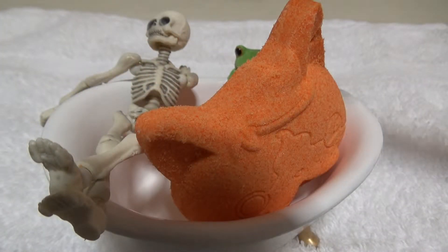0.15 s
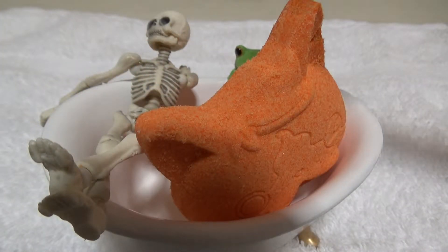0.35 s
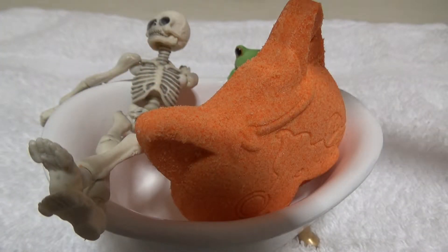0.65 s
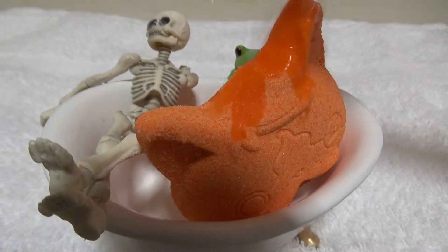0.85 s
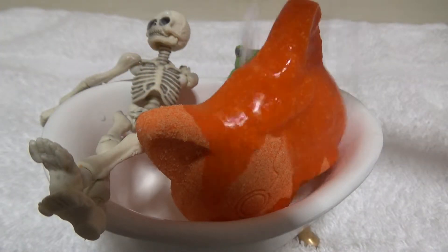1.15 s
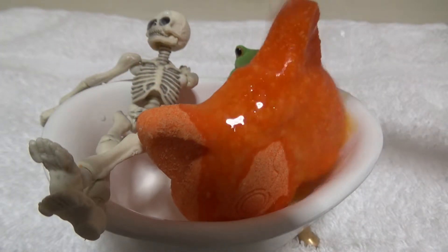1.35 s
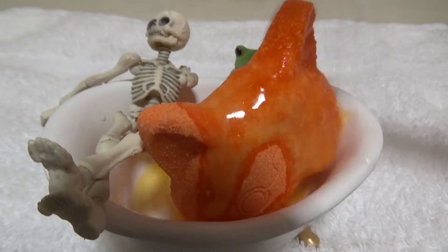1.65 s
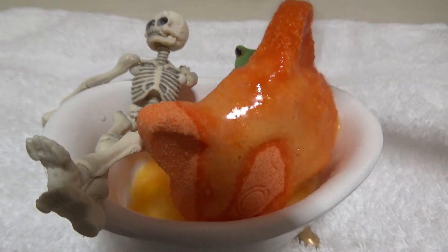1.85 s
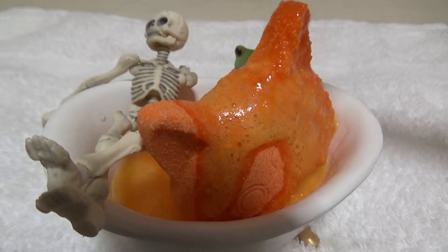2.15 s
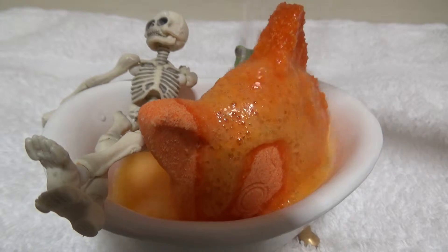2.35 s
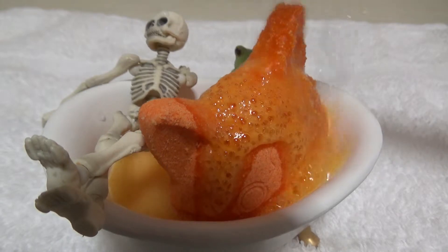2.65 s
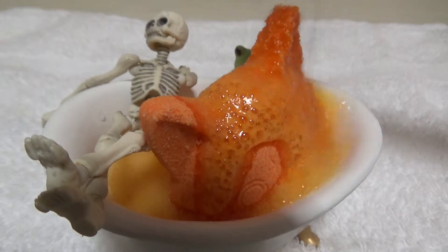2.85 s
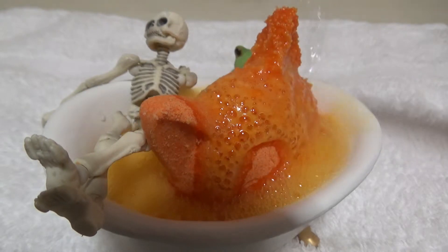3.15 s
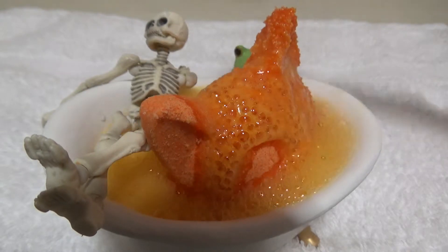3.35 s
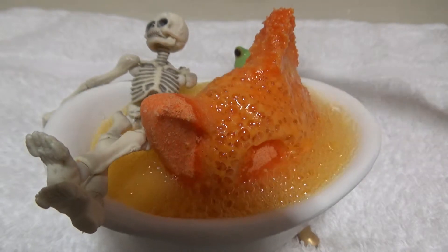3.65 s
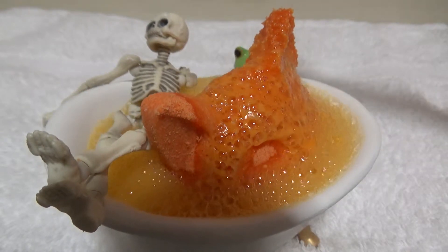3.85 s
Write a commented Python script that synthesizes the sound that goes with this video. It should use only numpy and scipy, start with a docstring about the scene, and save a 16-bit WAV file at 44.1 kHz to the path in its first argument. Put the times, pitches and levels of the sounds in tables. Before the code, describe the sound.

After nearly a second of faint ventilation and hum, drops tick on a hard tablet, then dense fizz grows into a steady sizzle with snapping bubbles and soft plops, heard close in a quiet room.

```python
"""A small tub in a quiet room: water is poured over a bath bomb, heard up close.
Thousands of tiny gas bubbles burst into a hiss that swells as the surface gets wet.
Larger bubbles snap and ring one by one, over faint crackle and low plops; a drop smacks the hard tablet.
Bursts are short decaying cavity rings, the smack is a set of decaying sines.
Behind them, filtered noise makes a soft ventilation rush and a sine a wavering mains hum."""
import sys
import numpy as np
from scipy import signal
from scipy.fft import rfft, irfft
from scipy.io import wavfile
from scipy.ndimage import uniform_filter1d

SR = 44100
rng = np.random.default_rng(int(sys.argv[2]) if len(sys.argv) > 2 else 0)


def transcribe(u):
    """Save the signal u as a 16-bit wav file named by the first command-line argument.

    u: samples, shape (n,) or (channels, n), limited to [-1, 1]; the rate is SR.
    q: integer samples, one column per channel.
    """
    v = np.clip(np.atleast_2d(u).T, -1, 1)
    q = np.round(v * 32767).astype(np.int16)
    wavfile.write(sys.argv[1], SR, q)


N = 176400

# Ventilation colour: pitch_hz, relative_db (per Hz)
RUSH_COLOUR = [(15, -42), (25, -21), (65, -11), (85, -9), (110, -5.5), (200, -7), (300, -11.5), (400, -14),
               (590, -17), (780, -16), (1050, -20.5), (1320, -23), (1700, -25.5), (2200, -22.5),
               (2900, -29), (4500, -30), (6300, -29.5), (8500, -31.5), (9300, -33.5), (10000, -24.5),
               (10900, -27.5), (11500, -31.5), (13000, -35), (15800, -31.5)]
# Stereo width of the rush: pitch_hz, side_minus_mid_db
RUSH_SIDE = [(30, -15), (150, -17), (500, -13), (1300, -18.5), (2000, -37), (5200, -34), (6200, -23),
             (10500, -18), (12000, -50)]
# Duct bands in the rush: pitch_hz, width_hz, relative_db
DUCT_BANDS = [(965.5, 53, 0), (1508, 150, -5), (2210, 84, -9)]
RUSH_DB, DUCTS_DB = -53.5, -63  # mid rms before the patches; the rush is gauged above 130 Hz
RUSH_PATCH_DB, RUSH_FLICKER_DB = 0.94, 0.31
# Wavering hum: start_s, level_db (rms)
HUM_LEVEL = [(0.0, -52), (0.03, -53.5), (0.27, -56.5), (0.31, -64), (0.59, -53.5), (0.81, -55), (0.87, -73),
             (0.91, -61), (1.24, -52.5), (1.31, -60), (1.66, -57), (1.73, -51), (2.19, -60.5), (2.27, -84),
             (2.38, -60), (2.56, -54.5), (2.88, -61.5), (3.32, -62), (3.34, -84), (3.58, -58), (3.71, -65),
             (3.75, -72), (3.81, -60), (4.0, -66)]
HUM_HZ = 100.7

# Plops of small unseen bubbles in the pool: start_s, level_db (rms)
GURGLE_LEVEL = [(1.4, -64), (1.9, -68), (2.3, -54.5), (2.5, -52), (2.7, -57), (3.0, -54), (3.3, -57.5),
                (4.0, -62)]
GURGLE_LOW_HZ, GURGLE_HIGH_HZ, GURGLE_CYCLES = 244, 2270, 1.18
GURGLES_PER_S = 10  # for each of 12 bubble sizes
CRACKLE_LOW_HZ, CRACKLE_HIGH_HZ, CRACKLE_CYCLES = 2730, 7000, 1.1
CRACKLES_PER_S, CRACKLE_SPREAD_DB = 14, 3  # rate for each of 12 bubble sizes
CRACKLE_DB = -5.5  # against the large fizz

# Larger bubbles and drops: start_s, snap_db, snap_hz, ring_db, ring_hz, ring_decay_cycles
BIG_BUBBLES = [(0.6589, -24.5, 7110, -20.5, 1330, 0.45), (0.6618, -34, 1010, -42, 2360, 5.2),
               (0.67, -45, 2110, -30.5, 380, 0.54), (0.8485, -37, 2100, -36, 1900, 3.6),
               (0.8539, -33, 4400, -43, 2250, 1.3), (0.8639, -39, 1710, -27.5, 250, 0.42),
               (0.9268, -24, 5220, -52, 185, 3.1), (0.954, -42, 5130, -27, 4890, 1.8),
               (1.0577, -30, 10500, -40, 9450, 1.5), (1.232, -43.5, 670, -19.5, 6670, 2.2),
               (1.2387, -40, 5500, -43, 4950, 1.5), (1.4273, -27, 3930, -14.5, 3570, 1.3),
               (1.4674, -30, 5480, -14.5, 3870, 1.3), (1.4958, -26, 4200, -15, 3600, 1.54),
               (1.5117, -17, 5970, -13, 3530, 1.9), (1.5353, -35, 5000, -38, 4500, 1.5),
               (1.5649, -50, 820, -31.5, 2340, 2.9), (1.621, -30.5, 1440, -9, 3320, 1.07),
               (1.732, -15, 6000, -24, 5400, 1.5), (1.7396, -25, 5500, -28, 4950, 1.5),
               (1.8668, -24, 4150, -23, 2270, 2.8), (1.9915, -11, 6870, -35, 450, 1.14),
               (1.9939, -48, 670, -37, 447, 1.1), (2.041, -12, 3260, -22, 2260, 1),
               (2.044, -6.5, 4850, -20, 1540, 0.7), (2.0491, -39, 670, -31, 1900, 3.5),
               (2.08, -45, 670, -12, 4330, 2.4), (2.1824, -9.5, 4930, -29.5, 406, 0.83),
               (2.2782, -22.5, 2660, -29, 380, 0.6), (2.3307, -17, 5910, -7, 5240, 2.4),
               (2.3359, -6.5, 5300, -13, 2600, 2.8), (2.3498, -11, 2810, -16.5, 640, 0.7),
               (2.353, -27, 930, -5, 2570, 1.8), (2.386, -10, 4000, -20, 2000, 0.8),
               (2.3929, -13, 3030, -24, 554, 0.47), (2.3985, -18.5, 2020, -4, 2680, 2.3),
               (2.4172, -21.5, 2040, -16, 2780, 2.1), (2.4333, -6.5, 4080, -28, 670, 0.74),
               (2.4546, -11, 5750, -27, 2510, 4.5), (2.4662, -30, 2300, -38, 2070, 1.5),
               (2.4758, -14, 2790, -17, 760, 1.0), (2.4835, -31, 690, -21, 2620, 3.0),
               (2.4932, -7.5, 5020, -28, 704, 0.7), (2.498, -14, 2700, -31, 740, 1.7),
               (2.5017, -22, 5500, -25, 4950, 1.5), (2.5072, -29, 675, -32, 460, 1.3),
               (2.5399, -20.5, 1580, -10, 2960, 1.5), (2.5553, -31, 720, -8, 3070, 0.63),
               (2.5907, -20, 3210, -31, 347, 0.82), (2.608, -29, 2500, -34, 2240, 1.5),
               (2.6388, -6, 4020, -21.5, 500, 0.49), (2.8059, -34, 2200, -37, 1980, 1.5),
               (2.8608, -13.5, 2720, -27, 445, 0.57), (2.8976, -29, 4000, -25, 3600, 1.5),
               (2.9208, -27, 3000, -30, 2700, 1.5), (2.9654, -16, 2600, -26, 1500, 0.8),
               (2.9739, -13, 3000, -24, 2000, 0.92), (3.0095, -10, 4190, -28, 330, 0.57),
               (3.0215, -31.5, 740, -10, 4530, 1.0), (3.029, -27.5, 1140, -15.5, 370, 0.92),
               (3.0678, -30, 2850, -14, 3430, 1.6), (3.1298, -37, 1030, -7, 4230, 2.3),
               (3.1646, -5.5, 6180, -26, 310, 0.47), (3.185, -36, 780, -30, 188, 0.76),
               (3.2058, -47, 880, -19.5, 2120, 1.2), (3.2193, -22, 4400, -27, 3960, 1.3),
               (3.2565, -36, 10940, -25, 347, 0.57), (3.3009, -34, 2400, -37, 2160, 1.5),
               (3.885, -27, 2270, -41, 444, 3.6)]
RING_RISE_CYCLES, RING_FALL_POWER = .4, 1.5

# Fizz by bubble size: start_s, large_db, middle_db, small_db (mid rms)
FIZZ_LEVELS = [(.8, -72, -61, -62), (.86, -70, -67, -68), (.93, -59, -64, -55), (1.0, -71, -63, -56.5),
               (1.1, -68, -61, -55.5), (1.2, -68, -57, -51), (1.33, -64.5, -49.5, -46),
               (1.45, -51, -43, -42), (1.55, -51, -41, -38.5), (1.65, -47, -38.5, -34),
               (1.71, -44.5, -36.5, -35.5), (1.73, -46.5, -32, -34), (1.77, -44, -34.5, -33.5),
               (1.85, -43.5, -33.5, -31.5), (2.0, -45.5, -32, -31), (2.2, -44.5, -33, -30.5),
               (2.35, -43, -32.5, -31.5), (2.5, -41.5, -30.5, -29.5), (2.7, -42, -31.5, -29.5),
               (2.95, -43, -31.5, -30.5), (3.15, -42.5, -32.5, -30), (3.5, -43.5, -32, -30),
               (4.0, -43, -32, -30)]
# Where large meets middle and middle meets small: edge_hz
FIZZ_EDGES = (3700, 9000)
# Tone of the hiss: pitch_hz, relative_db (per Hz)
HISS_COLOUR = [(590, -43), (1000, -10.5), (1040, -24), (1230, -19.5), (1500, -18.5), (1680, -15.5),
               (2400, -11.5), (4120, -4.5), (4780, -3), (5490, -4.5), (6450, -1.5), (8700, -5.5),
               (9650, -0.5), (10800, 1.5), (12900, -2.5), (15100, -8), (15600, -15)]
# Stereo width of the hiss: pitch_hz, side_minus_mid_db
HISS_SIDE = [(900, -11), (1300, -62), (9300, -99), (10300, -30), (11500, -16), (13200, -24.5), (14000, -60)]
FIZZ_LOW_HZ, FIZZ_HIGH_HZ, BURST_CYCLES = 1163, 16850, 1.52
# each of 24 sizes bursts at this rate when the small fizz is at FULL_DB, fewer while it is faint
FULL_BURSTS_PER_S, FULL_DB, SPARSE_POWER = 1500, -30, .35
BURST_SPREAD_DB, FIZZ_PATCH_DB = 1.5, 0.48
WET_S, WETTING_S = .78, .036  # onset of the fizz and its fade-in time

# Modes of the dry, hard tablet: pitch_hz, level_db, t60_s
TABLET_MODES = [(200, -32, 0.018), (1100, -23, 0.0041), (4260, -17.5, 0.0067), (6300, -10, 0.0031),
                (7460, -11, 0.0023), (10560, -5, 0.0028), (12800, -11, .003), (14300, -14, .003)]
SMACK_S, SMACK_RISE_S, SMACK_LENGTH_S = .9345, .00012, .1

# Hollow notes of the tub: pitch_hz, width_hz, level_db (against the direct sound)
HOLLOW_NOTES = [(460, 57, -6), (850, 74, -1.5)]
WALLS_DB, WALLS_T60_S, FIRST_WALL_S = -16, .02, .0006
LOW_CUT_HZ, EDGE_HZ = 14, 15740


def gain_of(db):
    """dB to gain."""
    return 10 ** (np.asarray(db) / 20)


def evened(x):
    """Scales to rms 1."""
    return x / np.sqrt(np.mean(x ** 2) + 1e-20)


def read(points, hz):
    """Reads a spectrum table on a log pitch axis."""
    f, value = np.transpose(points)
    return np.interp(np.log(hz + 1), np.log(f + 1), value)


def along(table, column):
    """Reads a time curve at every sample."""
    table = np.array(table)
    return np.interp(np.arange(N) / SR, table[:, 0], table[:, column])


def shaped(x, gain):
    """Filters by a gain per frequency bin."""
    return irfft(rfft(x) * gain, N)


def patchy(x, patch_db, flicker_db):
    """Drifting louder and softer patches, and a flicker shared by all pitches."""
    z = signal.stft(x, nperseg=256)[2]
    chance = rng.standard_normal(z.shape)
    across_pitch = uniform_filter1d(chance, 6, 0)
    patch = evened(uniform_filter1d(across_pitch, 20, 1))
    flicker = evened(uniform_filter1d(rng.standard_normal(z.shape[1]), 5))
    gain = gain_of(patch_db * patch + flicker_db * flicker)
    return signal.istft(z * gain, nperseg=256)[1][:N]


def room():
    """Ventilation rush with a few duct bands, nearly mono, and a hum whose level wavers."""
    hz = np.fft.rfftfreq(N, 1 / SR)
    mid_noise, side_noise, duct_noise = rng.standard_normal((3, N))
    rush = shaped(mid_noise, gain_of(read(RUSH_COLOUR, hz)))
    scale = gain_of(RUSH_DB) / shaped(rush, hz > 130).std()
    bands = sum(gain_of(db) / np.hypot(1, 2 * (hz - f) / width) ** 2 for f, width, db in DUCT_BANDS)
    ducts = gain_of(DUCTS_DB) * evened(shaped(duct_noise, bands))
    mid = patchy(scale * rush + ducts, RUSH_PATCH_DB, RUSH_FLICKER_DB)
    side_colour = gain_of(read(RUSH_COLOUR, hz) + read(RUSH_SIDE, hz))
    side = scale * shaped(side_noise, side_colour)
    tone = np.sqrt(2) * np.sin(2 * np.pi * HUM_HZ * np.arange(N) / SR)  # rms 1
    hum = gain_of(along(HUM_LEVEL, 1)) * tone
    return np.array([mid + side, mid - side]) + hum


def bubble(hz, cycles, size=900):
    """A cavity that swells, rings and dies; heard as the change of its volume, suction first."""
    turns = hz * np.arange(size) / SR
    rise = 1 - np.exp(-(turns / RING_RISE_CYCLES) ** 2)
    fall = np.exp(-(turns / max(cycles, .3)) ** RING_FALL_POWER)
    volume = np.sin(2 * np.pi * turns) * rise * fall
    return -np.gradient(volume) * SR / (2 * np.pi * hz)


def swarm(low_hz, high_hz, per_s, spread_db, cycles, count):
    """Bubble sizes bursting at random moments, random strength if spread; steady power at any rate."""
    out = np.zeros(N)
    for hz in np.geomspace(low_hz, high_hz, count):
        when, size = rng.random(N), rng.exponential(1, N)
        strength = gain_of(spread_db * np.minimum(size, 4)) / np.sqrt(per_s)
        hits = (when < per_s / SR) * strength
        out += signal.oaconvolve(hits, bubble(hz, cycles))[:N]
    return out


def gurgle():
    """Scattered low plops as the pool fills, each a ringing cavity."""
    plops = swarm(GURGLE_LOW_HZ, GURGLE_HIGH_HZ, GURGLES_PER_S, 0, GURGLE_CYCLES, count=12)
    return gain_of(along(GURGLE_LEVEL, 1)) * evened(plops)


def crackle():
    """Scattered middling bubbles that ring out of the hiss; their level follows the large fizz."""
    ticks = swarm(CRACKLE_LOW_HZ, CRACKLE_HIGH_HZ, CRACKLES_PER_S, CRACKLE_SPREAD_DB, CRACKLE_CYCLES, count=12)
    return gain_of(along(FIZZ_LEVELS, 1) + CRACKLE_DB) * evened(ticks)


def snap(hz, size=900):
    """The skin tears: one sharp dip between two small humps."""
    a = (np.pi * (hz * np.arange(size) / SR - .7)) ** 2  # dip lands 0.7 cycles in
    return (2 * a - 1) * np.exp(-a)


def pops():
    """Each large bubble snaps as its cavity rings and dies away."""
    out = np.zeros(N + 2000)
    for start_s, snap_db, snap_hz, ring_db, ring_hz, cycles in BIG_BUBBLES:
        sound = gain_of(snap_db) * snap(snap_hz) + gain_of(ring_db) * bubble(ring_hz, cycles)
        at = round(start_s * SR)
        out[at:at + len(sound)] += sound
    return out[:N]


def fizz():
    """Dense tiny bursts, widened by noise; large, middle and small bubbles swell on their own curves."""
    hz = np.fft.rfftfreq(N, 1 / SR)
    per_s = FULL_BURSTS_PER_S * gain_of(SPARSE_POWER * (along(FIZZ_LEVELS, 3) - FULL_DB))
    bursts = rfft(swarm(FIZZ_LOW_HZ, FIZZ_HIGH_HZ, per_s, BURST_SPREAD_DB, BURST_CYCLES, count=24))
    # flatten the spectrum, so that the colour table alone sets the tone
    flat = irfft(bursts / np.sqrt(uniform_filter1d(abs(bursts) ** 2, size=1500)), N)
    colour = gain_of(read(HISS_COLOUR, hz)) / (1 + (900 / (hz + 1)) ** 4)  # thinned below 900 Hz
    mid = shaped(patchy(flat, FIZZ_PATCH_DB, 0), colour)
    side_noise = evened(rng.standard_normal(N)) * flat.std()
    side = shaped(side_noise, colour * gain_of(read(HISS_SIDE, hz)))
    below_first, below_second = (1 / (1 + (hz / edge) ** 12) for edge in FIZZ_EDGES)
    shares = (below_first, below_second - below_first, 1 - below_second)  # large, middle, small
    out = np.zeros((2, N))
    for column, share in enumerate(shares, start=1):
        m, s = shaped(mid, share), shaped(side, share)
        out += np.array([m + s, m - s]) / m.std() * gain_of(along(FIZZ_LEVELS, column))
    return out * np.clip((np.arange(N) / SR - WET_S) / WETTING_S, 0, 1)


def smack():
    """A drop strikes the tablet once and its modes ring briefly."""
    t = np.clip(np.arange(N) / SR - SMACK_S, 0, SMACK_LENGTH_S)
    ring = sum(gain_of(db - 60 * t / t60) * np.sin(2 * np.pi * hz * t) for hz, db, t60 in TABLET_MODES)
    return ring * (1 - np.exp(-t / SMACK_RISE_S)) * (t < SMACK_LENGTH_S)


def tub(x):
    """Short reflections off the tub walls, and resonances for its hollow notes."""
    t = np.arange(3000) / SR
    sparse = rng.standard_normal(3000) * (rng.random(3000) < .08)
    taps = sparse * gain_of(-60 * t / WALLS_T60_S) * (t > FIRST_WALL_S)
    walls = signal.oaconvolve(x, taps / np.linalg.norm(taps))[:N]
    notes = sum(gain_of(db) * signal.lfilter(*signal.iirpeak(hz, hz / width, SR), x)
                for hz, width, db in HOLLOW_NOTES)
    return x + notes + gain_of(WALLS_DB) * walls


def scene():
    """All sources; the pops, plops, crackle and smack sit in the middle, inside the tub."""
    return room() + fizz() + tub(pops() + gurgle() + crackle() + smack())


def record(dry):
    """The deepest bass is cut, then the treble above the band edge."""
    cut = signal.lfilter(*signal.butter(2, LOW_CUT_HZ, "high", fs=SR), dry)
    band_limit = signal.firwin(1535, EDGE_HZ, window=("kaiser", 9), fs=SR)
    return signal.oaconvolve(cut, band_limit[None], "same")


dry = scene()
out = record(dry)
transcribe(out)
```